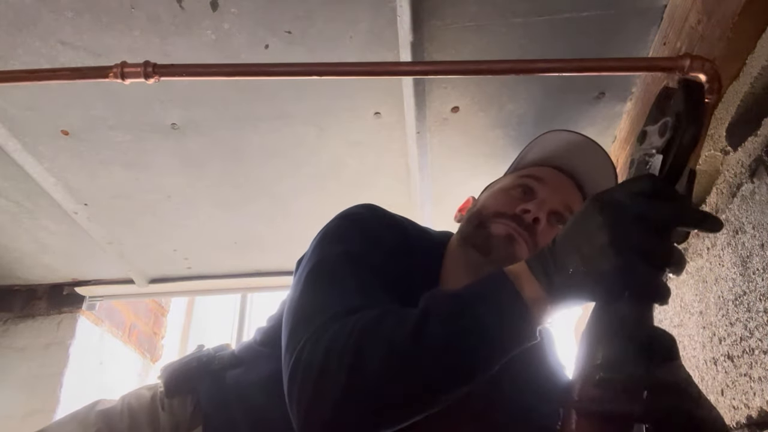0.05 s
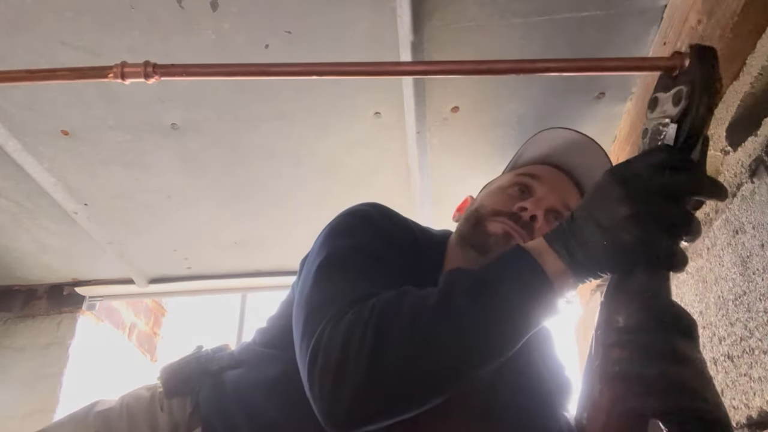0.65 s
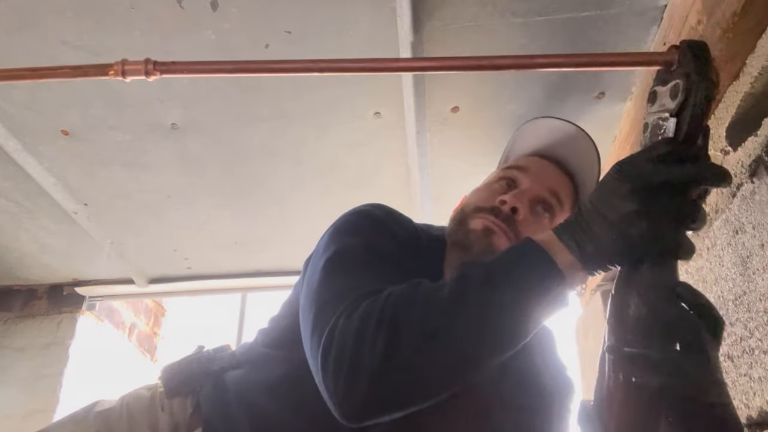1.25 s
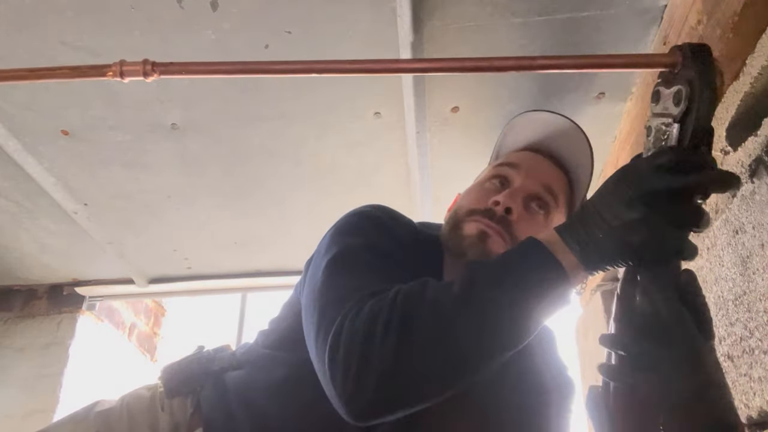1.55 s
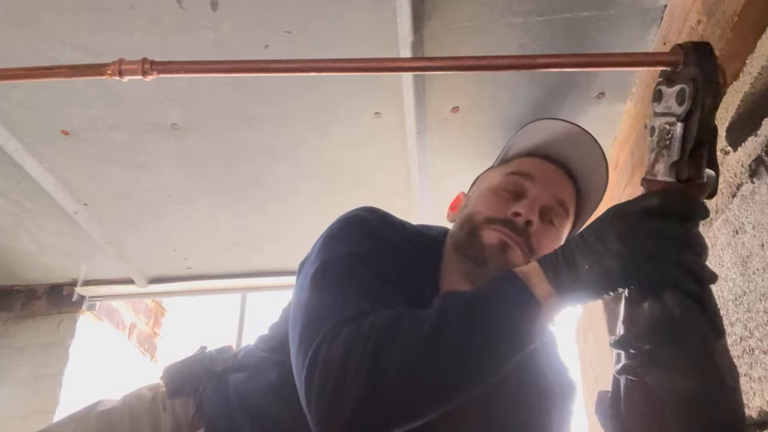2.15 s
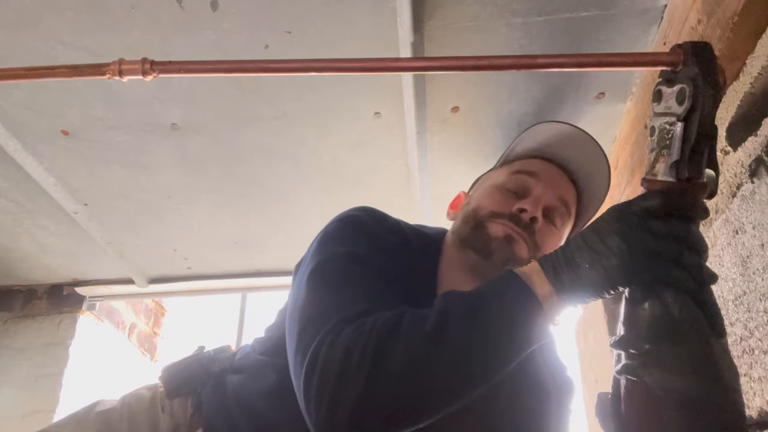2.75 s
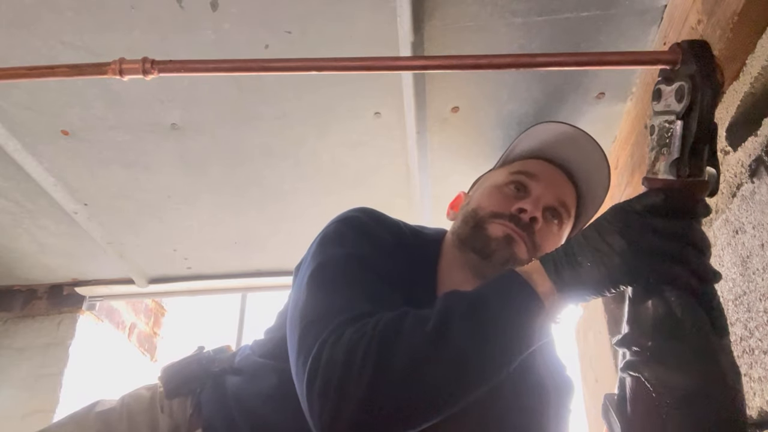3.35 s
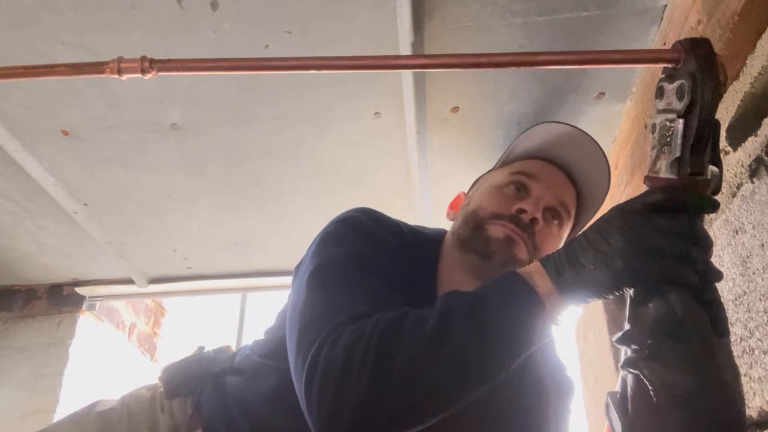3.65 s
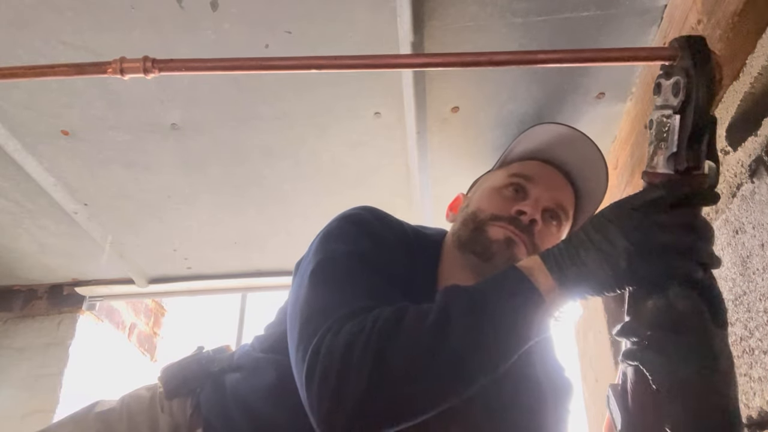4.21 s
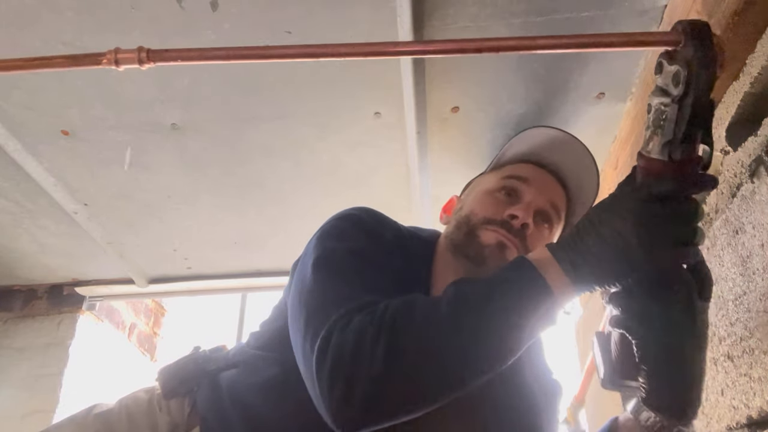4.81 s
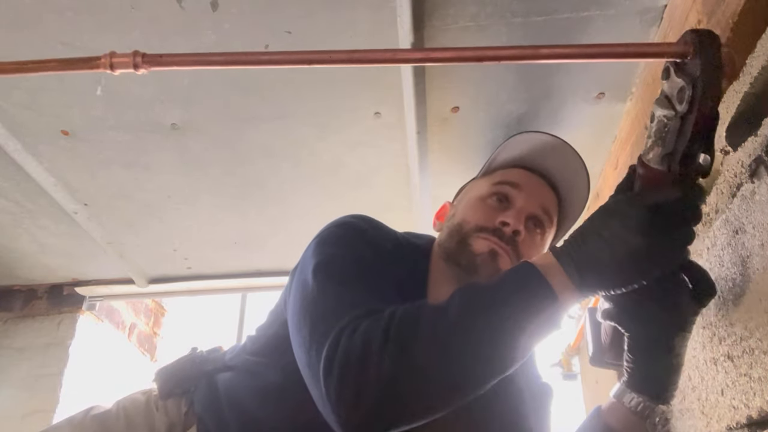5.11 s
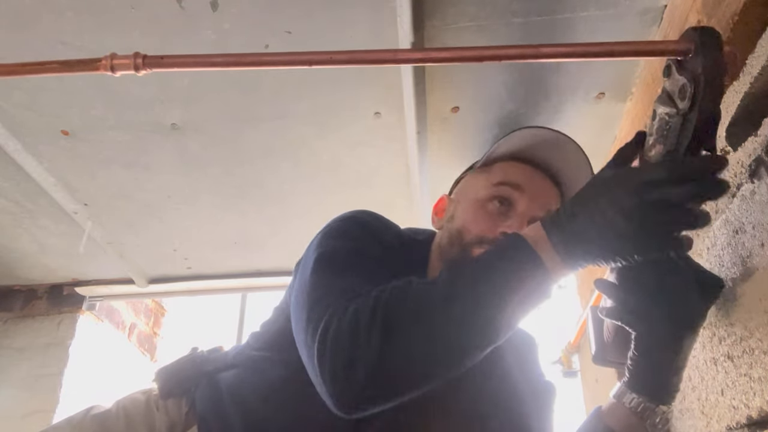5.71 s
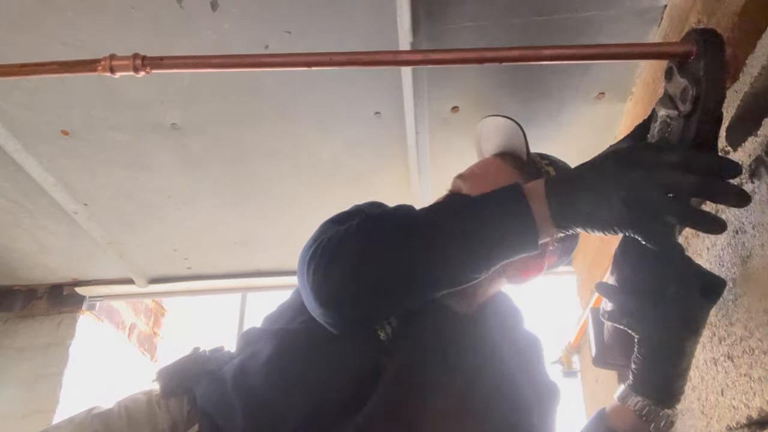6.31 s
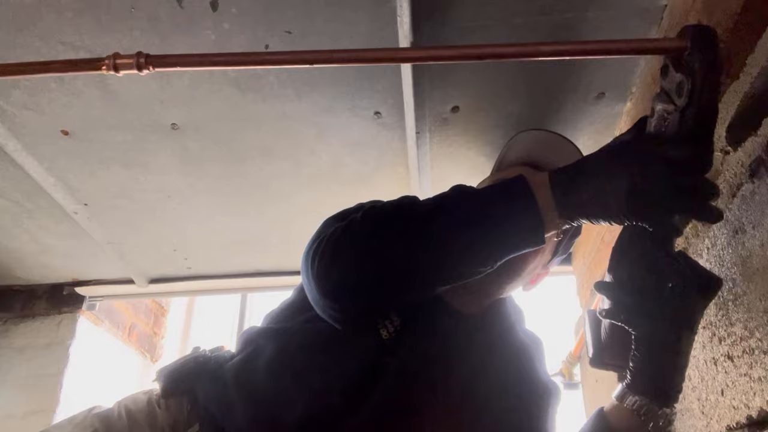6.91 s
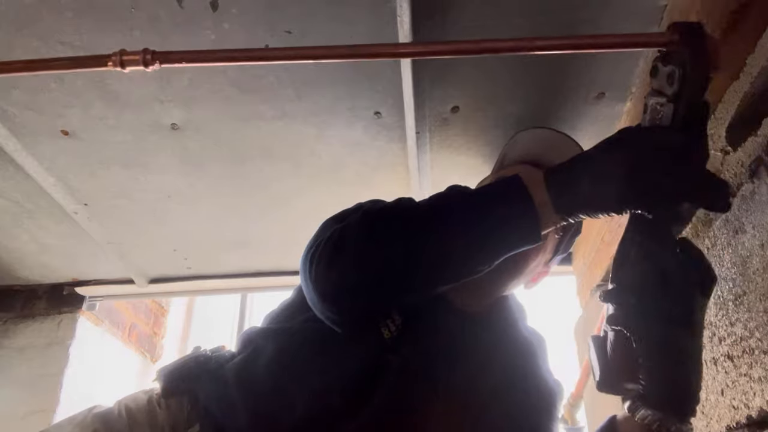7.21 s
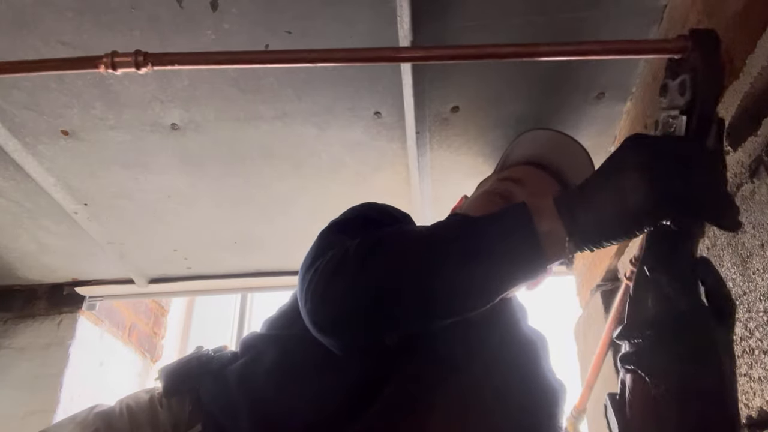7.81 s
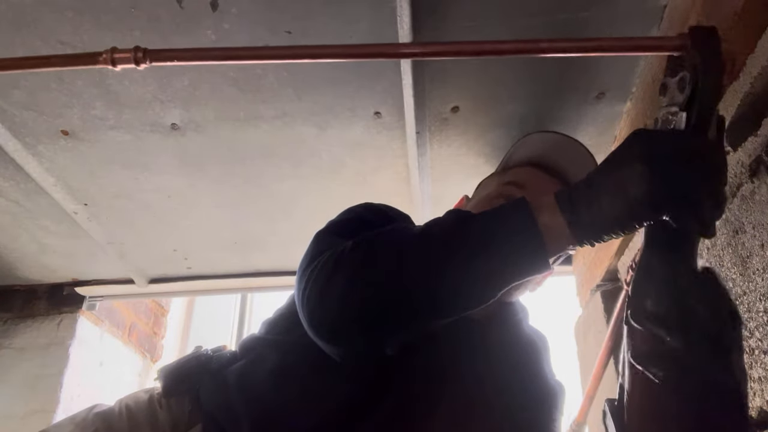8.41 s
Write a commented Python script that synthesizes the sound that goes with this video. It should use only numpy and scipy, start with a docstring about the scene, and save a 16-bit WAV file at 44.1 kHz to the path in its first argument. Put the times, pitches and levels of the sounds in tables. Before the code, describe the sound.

Metal jaws knock on a pipe fitting, then a power tool's geared motor strains, releases with a hiss and coasts to rest.

```python
"""Over a basement's low rumble, a battery press tool is seated on a copper fitting: jaws knock and
ring, gloves rub, the housing clicks. The motor spins up and drives a piston pump through whining gears,
with a low groan as the pump primes. As the jaws bite, the speed sags and lurches with each stroke.
The relief valve opens with a hiss, the motor races free, is cut and coasts to rest.
Last come more clicks, rubs and knocks as the tool is handled."""
import sys
import numpy as np
from scipy import signal
from scipy.fft import rfft, irfft, next_fast_len
from scipy.io import wavfile
from scipy.ndimage import uniform_filter1d

SR = 44100
rng = np.random.default_rng(int(sys.argv[2]) if len(sys.argv) > 2 else 0)


def persist_wave(psi):
    """Save psi, clipped to +-1, as 16-bit WAV."""
    counts = np.round(np.clip(psi, -1, 1) * 32767).astype(np.int16)
    wavfile.write(sys.argv[1], SR, np.atleast_2d(counts).T)


N = 377496
T = np.arange(N) / SR
# The motor starts, the jaws meet the fitting, the relief valve opens, the motor is cut.
START_S, CONTACT_S, RELEASE_S, CUT_S = 2.174, 2.7, 5.895, 6.305
TEETH, TURNS_PER_STROKE = 9, 5.895
STROKE_SCATTER = 0.18  # relative spread in the strength of the piston's knocks


def amp(db):
    """Amplitude grows tenfold for every 20 dB."""
    return 10 ** (np.asarray(db) / 20)


def unit(x):
    """Normalisation to an rms of 1."""
    return x / np.sqrt(np.mean(x ** 2) + 1e-20)


def since(s):
    """Elapsed time in seconds from the moment s; 0 before it."""
    return np.maximum(T - s, 0)


def read(points, hz):
    """Interpolation of a spectrum on a logarithmic frequency axis."""
    f, value = np.transpose(points)
    return np.interp(np.log(hz + 1), np.log(f + 1), value)


def curves(rows):
    """Linear interpolation of each column of a time table, sample by sample."""
    s, *columns = np.transpose(rows)
    return [np.interp(T, s, column) for column in columns]


def colour(x, points):
    """Filtering as spectral multiplication; each point is a frequency in Hz and a gain in dB."""
    size = next_fast_len(x.shape[-1] + 2048)
    gain = amp(read(points, np.fft.rfftfreq(size, 1 / SR)))
    return irfft(rfft(x, size) * gain, size)[..., :x.shape[-1]]


def wander(hz):
    """Random modulation of rms 1, with hz new values a second."""
    points = rng.standard_normal(N // 16)
    return unit(np.interp(T * hz, np.arange(len(points)), points))


def add(mix, s, sound):
    """Superposition of a sound on the mix, starting at s seconds."""
    part = mix[max(round(s * SR), 0):][:len(sound)]
    part += sound[:len(part)]


# Spectrum of the room noise before its bass is shaped. Each row: frequency in Hz, gain in dB.
RUMBLE_SPECTRUM = [(12, -39), (20, -2.5), (78, 1), (135, -12.5), (223, -21), (294, -23), (525, -31.5),
                   (733, -38), (889, -39.5), (2220, -53), (2850, -56.5), (3090, -55.5), (6910, -66),
                   (10500, -58), (15000, -80.5)]
# Course of the rumble. Each row: time in seconds, level in dB.
RUMBLE_LEVEL = [(0, -43), (3.5, -42), (5.3, -47.5), (6.5, -44.5), (7.6, -43), (8.3, -41.5)]
# A steady high tone. Each row: frequency in Hz, rms level in dB.
STEADY_TONE = [(10352, -95)]


def rumble(side_db=-17):
    """Coherence at long wavelengths: the building rumbles alike in both ears, with faint hiss and tone."""
    bass_shape = [(22, -26.0), (32, -6.5), (44, 3.5), (62, 1.0), (80, -6.0), (140, 3.0)]
    mid, side = colour(colour(rng.standard_normal((2, N)), RUMBLE_SPECTRUM), bass_shape)
    side = colour(side, [(60, side_db), (150, -8.5), (500, 0.5), (2000, 0.0)])
    (level_db,) = curves(RUMBLE_LEVEL)
    air = np.array([mid + side, mid - side]) / np.std(mid) * amp(level_db)
    return air + sum(amp(db) * np.sqrt(2) * np.sin(2 * np.pi * hz * T) for hz, db in STEADY_TONE)


# Reverberation of the basement. Each row: frequency in Hz, time to fall 60 dB in seconds.
ROOM_T60 = [(150, 0.02), (600, 0.3153), (2000, 0.12), (6000, 0.19), (14000, 0.13)]
# How alike left and right sound in each band: wide below 5.5 kHz, narrowing to one point near 12 kHz.
# Each row: frequency in Hz, likeness from 0 to 1.
STEREO_LIKENESS = [(250, 0.034), (600, 0), (5500, 0), (7000, 0.31), (9000, 0.76), (12000, 1),
                   (14000, 0.014)]


def echo(x):
    """Reverberation: dense reflections from walls and ceiling die away exponentially in each band."""
    t = np.arange(SR // 2) / SR
    reflections = rng.standard_normal((2, len(t))) * (rng.random((2, len(t))) < .07) * (t > .002)
    hz, s, (left, right) = signal.stft(reflections, SR, nperseg=256)
    likeness = np.clip(read(STEREO_LIKENESS, hz), 0, 1)[:, None]
    right = likeness * left + np.sqrt(1 - likeness ** 2) * right
    decay = amp(-60 * s / read(ROOM_T60, hz)[:, None])
    _, tail = signal.istft(np.array([left, right]) * decay, SR, nperseg=256)
    tail /= np.linalg.norm(tail, axis=1, keepdims=True)
    return signal.oaconvolve(x[None], tail, axes=1)[:, :N]


# The tool's balance. Each row: frequency in Hz, left minus right level in dB before scaling by aside.
LEVEL_DIFFERENCE = [(60, -9.5), (110, -7), (200, -9.5), (380, -2.5), (1050, -5), (1350, 1.5), (2300, 1.5),
                    (3200, 6), (4100, -4.5), (5400, -18), (6600, -7), (8500, -2), (10500, -0.5)]
# Phase between the microphones. Each row: frequency in Hz, lead of the left in radians at facing 1.
PHASE_DIFFERENCE = [(480, 0), (800, -2.5), (1130, -1.2), (1450, -3.1), (2200, -3.7), (3200, -4.3),
                    (3800, -5.7), (5300, -8.3), (6000, -9.9), (7000, -9.4), (8200, -9.1), (9200, -8.4),
                    (11200, -6.3), (12200, -6.2), (14000, -3.9)]
# Response of both microphones. Each row: frequency in Hz, gain in dB.
MIC_RESPONSE = [(400, -0.5), (650, 0), (1000, 0.2), (1300, 0), (1650, 2.27), (2100, 1.37), (3200, 0.97),
                (4000, 0), (5400, -1), (6300, 0.87), (7700, 4.08), (8600, 2.5), (9500, 0.23), (11200, -2.5),
                (14000, -1)]


def basement(x, wet_db, facing=1, aside=0.61, tails=1, sway_hz=5, shadow_hz=7000):
    """Direct and reverberant sound add; differences of phase and level place the source.
    Facing 1 (right) delays the left channel; -1 (left) advances it."""
    shares = np.exp([wander(sway_hz) for _ in range(tails)])  # hand sway shifts the echo among tails
    wet = sum(echo(x * share) for share in shares / np.linalg.norm(shares, axis=0))
    left, right = (x + amp(wet_db) * wet) / np.hypot(1, amp(wet_db))
    size = next_fast_len(N + 2048)
    hz = np.fft.rfftfreq(size, 1 / SR)
    # Above shadow_hz the microphone's casing alone sets how the phase runs on.
    phase = read(PHASE_DIFFERENCE, hz) + (facing - 1) * read(PHASE_DIFFERENCE, np.minimum(hz, shadow_hz))
    lean = amp(aside * read(LEVEL_DIFFERENCE, hz) / 2)
    spectra = np.array([rfft(left, size) * lean * np.exp(1j * phase), rfft(right, size) / lean])
    return irfft(spectra * amp(read(MIC_RESPONSE, hz)), size)[:, :N]


# Gloves and sleeves on the tool. Each row: start in seconds, length in seconds, relative level in dB.
GLOVE_SLIDES = [(0.943, 0.11, -59.5), (1.423, 0.064, -56), (1.647, 0.24, -53.5), (1.863, 0.038, -58),
                (1.94, 0.24, -69.5), (6.91, 0.037, -41), (6.925, 0.34, -55.5), (6.967, 0.032, -39),
                (7.284, 0.18, -56), (7.514, 0.21, -52), (7.826, 0.2, -55.5), (8.15, 0.15, -48.5),
                (8.255, 0.2, -53.5), (8.432, 0.15, -61.5)]
# Spectrum of rubbing fabric. Each row: frequency in Hz, relative level in dB.
FABRIC_SPECTRUM = [(500, 0.5), (1500, -3), (3200, -7), (4500, -10), (8000, -4), (10200, -4.5), (13000, -12),
                   (15000, -11)]


def gloves(gain_db=1, grain=0.7):
    """Stick-slip friction: fabric catches in fine grains, and each slide swells and fades in one arch."""
    envelope = np.zeros(N)
    for s, length, db in GLOVE_SLIDES:
        add(envelope, s, amp(db) * np.sin(np.pi * np.arange(0, length, 1 / SR) / length))
    friction = rng.standard_normal(N) * np.exp(grain * np.tanh(wander(600)))
    return amp(gain_db) * envelope * unit(colour(friction, FABRIC_SPECTRUM))


def blow(low_db, middle_db, high_db, t60, attack_s=0.00021):
    """Modal overlap: an impact's dense, damped modes merge into decaying noise, shaped in three bands."""
    t = np.arange(8192) / SR
    spectrum = [(120, low_db - 10.5), (380, low_db - 3.5), (700, low_db),
                (1550, (low_db + middle_db) / 2 - 0.5),
                (2300, middle_db), (3100, middle_db - 7.5), (3900, middle_db - 10.5),
                (5200, (middle_db + high_db) / 2 + 0.5), (7500, high_db - 3.5), (13000, high_db - 7.0)]
    noise = colour(rng.standard_normal(len(t)), spectrum)
    return noise * amp(-60 * t / t60) * np.minimum(t / attack_s, 1)


# Clicks of housing and trigger. Each row: start in seconds, relative levels of the low, middle and
# high bands in dB, time to fall 60 dB in seconds.
HOUSING_CLICKS = [(1.4364, -60, -60, -63, 0.027), (2.165, -34.5, -54, -69, 0.065),
                  (5.686, -48, -42, -27, 0.02), (7.061, -35, -37, -30, 0.031),
                  (7.108, -36.5, -44, -64, 0.033), (7.138, -59, -67, -52, 0.028),
                  (7.175, -43, -53, -57, 0.041), (7.21, -67, -55.5, -64, 0.025),
                  (7.276, -41, -66, -72, 0.061), (7.469, -58, -58, -63, 0.02),
                  (7.64, -42, -45, -49.5, 0.033), (8.189, -48, -69, -41, 0.16),
                  (8.478, -59, -63, -65, 0.033)]


def clicks(click_db=20, snap_db=3):
    """Heavy damping: the plastic housing gives a snap of contact and a short click with no pitch."""
    out = np.zeros(N)
    for s, low_db, middle_db, high_db, t60 in HOUSING_CLICKS:
        add(out, s, amp(click_db) * blow(low_db, middle_db, high_db, t60))
        add(out, s, amp(high_db + snap_db) * rng.standard_normal(100) * np.hanning(100))
    return out


# Jaws striking the fitting. Each row: start in seconds, relative levels of the low, middle and high
# bands and of the ring in dB, ring's tilt in dB per octave, blow's time to fall 60 dB in seconds.
JAW_KNOCKS = [(0.268, -35, -29, -40, -28.5, 0, 0.063), (0.28, -25.5, -28.5, -66, -42, -7, 0.086),
              (0.348, -37, -46, -67, -33.5, 1, 0.22), (0.41, -40, -62, -70, -40, -5, 0.12),
              (0.532, -36, -57, -74, -43, -5.5, 0.098), (0.578, -32, -48.5, -68, -37, -5, 0.17),
              (0.733, -32.5, -39.5, -64, -32, 2, 0.12), (0.768, -26, -44, -55, -42, -3, 0.058),
              (1.197, -31, -52.5, -66, -46, -14, 0.084), (1.454, -33.5, -54, -72, -44, -5, 0.1),
              (1.474, -31.5, -38.5, -53, -46.5, -1, 0.082), (7.389, -26.5, -25, -44.5, -29.5, 0.5, 0.059),
              (7.857, -37, -48, -47, -50, -3, 0.057), (7.883, -35.5, -54, -48, -54, -1, 0.14),
              (7.942, -41, -53, -61, -60, 2, 0.097), (8.141, -25, -44.5, -50, -46, -4, 0.054),
              (8.159, -27, -60, -40, -49, 0, 0.06)]
# Modes of jaws and pipe. Each row: frequency in Hz, relative level in dB, time to fall 60 dB in seconds.
METAL_MODES = [(556.2, 6, 0.31), (588, 0, 0.3), (724, 7, 0.14), (839, 7, 0.12), (1053, -5, 0.11),
               (1142, 3.5, 0.11), (1305, 7.5, 0.1), (1835, 13, 0.11), (1886, 16.5, 0.082), (2144, 9, 0.12),
               (2320, -3, 0.078), (2575, 6, 0.12), (2930, -6, 0.14), (3130, 0, 0.12), (3214, -2, 0.17),
               (3400, -9, 0.09), (4230, -25, 0.091), (5240, -20, 0.053)]


def jaws(blow_db=13.0, ring_db=-0.5, scatter_db=3, pivot_hz=1800):
    """Free vibration: jaws and copper pipe ring after a knock; where it lands decides each mode's share."""
    out, t = np.zeros(N), np.arange(SR // 2) / SR
    for s, low_db, middle_db, high_db, metal_db, tilt_db, t60 in JAW_KNOCKS:
        ring = np.zeros(len(t))
        for hz, db, mode_t60 in METAL_MODES:
            mode_db = db + tilt_db * np.log2(hz / pivot_hz) + scatter_db * (2 * rng.random() - 1)
            ring += amp(mode_db - 60 * t / mode_t60) * np.sin(2 * np.pi * (hz * t + rng.random()))
        add(out, s, amp(metal_db + ring_db) * ring / np.std(ring[:800]) * np.minimum(t / 0.0071, 1))
        add(out, s, amp(blow_db) * blow(low_db, middle_db, high_db, t60, attack_s=0.00164))
    return out


def valve(hiss_db=-22.0, t60=0.47, attack_s=0.0062):
    """Jet noise: oil spurts through the relief valve, and the hiss fades as the pressure drops."""
    t = since(RELEASE_S - 0.015)
    spray = unit(colour(rng.standard_normal(N), [(500, -25), (3500, -14), (7500, 12), (13000, 11.5)]))
    return amp(hiss_db - 60 * t / t60) * np.minimum(t / attack_s, 1) * spray


# The pump priming. Each row: time in seconds, frequency in Hz, rms level in dB.
PRIMING_GLIDE = [(2.23, 209, -65.5), (2.27, 167, -39), (2.33, 146, -46.5), (2.40, 145, -35.5),
                 (2.45, 128, -31.5), (2.49, 120, -76)]


def groan(fade_s=0.0091):
    """A glide, its phase the integral of frequency: a short tone falls as the oil starts to move."""
    hz, db = curves(PRIMING_GLIDE)
    start, end = PRIMING_GLIDE[0][0], PRIMING_GLIDE[-1][0]
    gate = np.clip(np.minimum(T - start, end - T) / fade_s, 0, 1)
    return amp(db) * np.sqrt(2) * np.sin(2 * np.pi * np.cumsum(hz) / SR) * gate


# The speed the motor can hold as the jaws squeeze. Each row: time in seconds, speed in turns a second.
HELD_SPEED = [(2.35, 350), (2.55, 352.5), (3.24, 354.3), (3.38, 349.6), (3.53, 339.5), (3.96, 333.6),
              (4.32, 307.3), (4.82, 289.4), (5.3, 278.4), (5.68, 266), (5.85, 251)]


def motor(spin_up_s=0.036, recover_s=0.078, coast_s=0.455, dump_s=0.065):
    """Inertia and load: the motor spins up, sags, recovers on release, then coasts against friction."""
    free_speed, loaded_speed, open_speed, dry_friction = 356, 252, 348, 76  # turns a second
    (held,) = curves(HELD_SPEED)
    speed = held * (1 - np.exp(-since(START_S) / spin_up_s))
    speed = open_speed + (speed - open_speed) * np.exp(-since(RELEASE_S) / recover_s)
    speed = np.maximum((speed + dry_friction) * np.exp(-since(CUT_S) / coast_s) - dry_friction, 0)
    opened = 1 - np.exp(-since(RELEASE_S) / dump_s)
    load = (free_speed - held) / (free_speed - loaded_speed) * (1 - opened)
    slowed_db = 20 * np.log10(np.where(T > CUT_S, speed / open_speed, 1) + 1e-4)
    return speed, load, opened, slowed_db


def shaft(speed, load, flutter=0.00145, lurch_depth=0.078, stumble=0.05):
    """Periodic loading slows the motor in each stroke; gives running counts of turns and strokes."""
    strokes = np.cumsum(speed) / SR / TURNS_PER_STROKE
    lurch = lurch_depth * np.clip(load, 0, 1) ** 1.4
    ripple = lurch * (stumble * wander(120) - np.sin(2 * np.pi * strokes)) + flutter * wander(200)
    return np.cumsum(speed * (1 + ripple)) / SR, strokes


def beats(strokes, scatter):
    """An impulse train: one pulse of random strength for each stroke."""
    return np.diff(np.floor(strokes), prepend=0) * (1 + scatter * rng.standard_normal(N))


def thud(load, strokes, level_db=-48):
    """Reaction force: under pressure each stroke shoves the whole tool."""
    response = [(70, -14), (140, 5.0), (200, -35.5), (340, 12.0), (500, -22.0), (1500, -59.5)]
    shove = colour(beats(strokes, 2 * STROKE_SCATTER), response)
    return amp(level_db) * unit(shove) * np.clip(2 * load, 0, 1) ** 2


def hum(speed, turns, strokes, level_db, third_db=-7, body_hz=430, half_width_hz=130, body_db=-40,
        inrush_db=-26, inrush_s=0.049):
    """Rotating unbalance: the shaft hums, and its third order sweeps through the body's resonance."""
    throb = 1 + 0.45 * np.cos(2 * np.pi * strokes) + 0.12 * wander(53)
    first = amp(level_db) * np.clip(speed / 300, 0, 1) ** 6
    detuning = (3 * speed - body_hz) / half_width_hz
    resonance = amp(body_db) / np.hypot(1, detuning) * np.clip(speed / 115, 0, 1) ** 4
    torque = 1 + np.clip(np.gradient(speed) * SR / 1000, 0, 2)  # greatest while speeding up
    # The starting current makes the motor growl.
    inrush = amp(inrush_db) * np.clip(speed / 120, 0, 1) ** 2 * np.exp(-since(START_S) / inrush_s)
    third = first * amp(third_db) + resonance * torque + inrush
    return throb * (first * np.cos(2 * np.pi * turns) + third * np.cos(2 * np.pi * 3 * turns))


# Spectrum of tooth and bearing impacts. Each row: frequency in Hz, relative level in dB.
IMPACT_SPECTRUM = [(100, -26), (220, -4.5), (400, -1), (900, -5.5), (1250, 1.5), (1550, -2), (2000, 5.5),
                   (2550, -2.5), (3400, 6.5), (4150, -2), (5500, 3.5), (7700, -2), (9500, 3), (14500, -6)]


def rattle(speed, load, strokes, level_db, gain_db=2, grain=0.44, dull_db=-3, fizz_db=-5):
    """Impact noise: countless small hits pulse with the crank, fizzy at full speed, duller when slow."""
    pulsing = (0.11 + 0.22 * load) * np.cos(2 * np.pi * strokes)
    impacts = rng.standard_normal(N) * np.exp(grain * wander(2500) + pulsing)
    bright = unit(colour(impacts, IMPACT_SPECTRUM))
    dull = unit(colour(impacts, [(150, -29.0), (400, -4.0), (1300, 6.0), (2500, -10.5), (6000, -52.5)]))
    fizz = unit(colour(rng.standard_normal(N), [(6000, -33.5), (10000, -16), (12800, 12), (14500, -4.5)]))
    pace = np.clip(speed / 355, 0, 1)
    blend = bright + amp(dull_db) * dull * (1 - pace) + amp(fizz_db) * fizz * pace ** 14
    return amp(level_db + gain_db) * blend


# The housing's response to the piston. Each row: frequency in Hz, relative gain in dB.
HOUSING_RESPONSE = [(100, -25), (150, -25), (220, -17), (320, -10.5), (390, 7.5), (490, -9.5), (590, 6),
                    (740, 5), (850, 7.5), (950, 1), (1060, -4), (1250, -11), (1450, -13.5), (1680, -15.5),
                    (1900, -1.5), (2200, -1.5), (3200, -8.5), (4500, -34), (9000, -34.5)]


def pump(speed, load, strokes, level_db, gain_db=-3, t60=0.087, idle_db=-5):
    """Impulse response: each knock of the piston rings the housing, harder against pressure."""
    pulses = beats(strokes, STROKE_SCATTER)
    t = np.arange(4096) / SR
    # Only the phase of a decaying noise is kept, so none of the dense modes sticks out.
    phase = np.angle(rfft(rng.standard_normal(len(t)) * amp(-60 * t / t60)))
    ring = colour(irfft(np.exp(1j * phase)), HOUSING_RESPONSE)
    knocks = signal.oaconvolve(pulses, ring)[:N]
    softer_db = idle_db * np.clip(1 - 2 * load, 0, 1)
    return amp(level_db + gain_db + softer_db) * knocks / np.std(knocks[speed > 200])


def slow_gear(speed, load, turns, strokes, level_db, gain_db=-1, load_swing_rad=5.65, order=19):
    """Phase modulation: the crank gear growls, its tooth rate swinging each stroke, wider under load."""
    response = [(450, -13.5), (590, 5.5), (720, -4.5), (880, 6), (1170, 5), (1300, -1), (1450, -10.5)]
    crank = 2 * np.pi * strokes
    wobble = 0.84 * np.sin(2 * crank) + 0.62 * wander(200)
    mesh = order * crank + (1 + load_swing_rad * load) * np.sin(crank) + wobble
    force = unit(np.exp(0.57 * np.cos(crank - 0.95) + .15 * wander(150)))
    teeth = colour(force * np.cos(mesh), response)
    # Load brings out an overtone that sags with the motor.
    overtone_phase = 2 * np.pi * 2 * (order - 1) * turns / TURNS_PER_STROKE + 2 * wobble
    overtone = amp(-12 + 14 * load) * force * np.cos(overtone_phase)
    return amp(level_db + gain_db) * (teeth + overtone) * np.clip(speed / 250, 0, 1) ** 3


# Modes of the gear casing. Each row: frequency in Hz, bandwidth in Hz, gain in dB.
CASING_RESONANCES = [(5420, 170, -1), (4800, 160, -6), (2460, 120, -8)]


def casing(x):
    """Resonance: the gear casing adds its ring whenever a tone sweeps across one of its modes."""
    return x + sum(amp(db) * signal.lfilter(*signal.iirpeak(hz, hz / width, SR), x)
                   for hz, width, db in CASING_RESONANCES)


# How well the gearbox radiates a tooth tone. Each row: frequency in Hz, gain in dB.
GEARBOX_RESPONSE = [(450, -17), (1200, -14.5), (1600, -23.5), (2150, -19.5), (2500, -25), (2800, -22.5),
                    (2980, -25.5), (3170, -23), (3300, -22.5), (3900, -28), (4100, -32), (4450, -33.5),
                    (4750, -31), (5050, -25.5), (5250, -26), (5500, -27.5), (5750, -29), (6050, -29.5),
                    (6400, -26), (7400, -32.5), (8250, -32), (9050, -20.5), (9550, -36.5), (11000, -37),
                    (12700, -32)]


def fast_gear(load, turns, strokes, level_db, tone_db, octave_db, eccentric_rad=0.61, slack_rad=0.15,
              jitter_rad=0.42, scuff_db=-30):
    """Modulation sidebands: the crank presses the meshing teeth together once a stroke.
    Load makes them chatter, so the whistle at the tooth rate turns to a rasp."""
    crank = 2 * np.pi * strokes
    squeeze = ((.35 + np.minimum(load, .7)) * np.cos(crank) - .22 * load * np.cos(2 * crank)
               + .2 * (1 - load) * np.cos(3 * crank))
    force = np.exp(squeeze + .13 * wander(300))
    force /= np.sqrt(uniform_filter1d(force ** 2, size=8192))  # holds the running rms at 1
    runout = np.sin(crank) + .5 * np.sin(2 * crank) + 0.45 * np.sin(3 * crank)
    mesh = 2 * np.pi * TEETH * turns + eccentric_rad * (1 - load) * runout + slack_rad * wander(500)
    strain = np.sqrt(np.clip(load, 0, 1))
    jitter = jitter_rad * strain * wander(400)
    chatter = unit(np.exp(.7 * strain * np.cos(4 * crank + .4 * wander(90))))
    before_contact = (1 - np.tanh((T - CONTACT_S) / 0.07)) / 2
    harmonics = [amp(3 * before_contact + tone_db) * chatter, amp(2.47 + octave_db), amp(-1),
                 amp(-6 - 25 * load)]  # only a lightly loaded gear sings the fourth
    mellow_db = -0.5 * np.minimum(since(CUT_S) / 0.043, 1)  # undriven teeth meet softly
    whine = sum(gain * amp(k * mellow_db) * np.cos(k * mesh + jitter / k)
                for k, gain in enumerate(harmonics, 1))
    scrape = force ** 2 * rng.standard_normal(N)  # hard-pressed teeth scuff and ring the casing
    scuff = amp(scuff_db) * load * unit(casing(scrape) - scrape)
    radiated = casing(colour(force * whine, GEARBOX_RESPONSE)) + scuff
    return amp(level_db) * radiated * np.minimum(since(START_S) / 0.15, 1)


# Each part's level over the cycle. Each law: relative level running light in dB, dB added at full
# pressure, dB added with the valve open, dB of level per dB of speed while coasting.
WHINE_LEVELS = (-0.5, -2.5, -5, 1.2)
HUM_LEVELS = (-31.5, -10, -5.5, 1)
PUMP_LEVELS = (-31, -1, -2.5, 4)
GROWL_LEVELS = (-33.5, -8, -6.5, 3)
RATTLE_LEVELS = (-27, -4, -3, 1.33)
# Slow swells. Each row: time in seconds, then gains in dB of the tooth tone, of its octave, and of
# the pump and slow gear together.
LEVEL_SWELLS = [(2.3, 1, -2.5, 0.5), (2.8, 1, -6.5, 1.5), (3.25, 1, -0.5, -1), (3.7, 0.5, -0.5, -2.5),
                (4.1, 1.5, 3, 0), (4.42, -3, 3, 3.5), (4.62, -0.5, -1.5, 3), (5.0, -3.5, 0, 1),
                (5.32, -1.5, -2, 2.5), (5.6, -1, 0, 2.5), (5.9, -1, 2, -3.5), (6.1, -2, -0.5, 1)]


def scene(kick_db=6, kick_s=0.013, early_s=0.0088):
    """Superposition: the parts driven by one motor and the handling noises add in a reverberant room."""
    speed, load, opened, slowed_db = motor()
    turns, strokes = shaft(speed, load)
    laws = WHINE_LEVELS, HUM_LEVELS, PUMP_LEVELS, GROWL_LEVELS, RATTLE_LEVELS
    whine_db, hum_db, pump_db, growl_db, rattle_db = (
        light + pressed * load + released * opened + coasting * slowed_db
        for light, pressed, released, coasting in laws)
    tone_db, octave_db, stroke_db = curves(LEVEL_SWELLS)
    jolt_db = kick_db * np.exp(-since(START_S + kick_s) / kick_s)  # the first strokes jolt the housing
    running = np.minimum(since(START_S - early_s) / 0.045, 1)  # gears take up slack just before turning
    low = running * (hum(speed, turns, strokes, hum_db) + thud(load, strokes)) + groan()
    whine = fast_gear(load, turns, strokes, whine_db, tone_db, octave_db)
    growl = running * slow_gear(speed, load, turns, strokes, growl_db + stroke_db)
    piston = running * pump(speed, load, strokes, pump_db + jolt_db + stroke_db)
    clatter = running * rattle(speed, load, strokes, rattle_db) + valve()
    return (basement(low, wet_db=-7.0)
            + basement(whine + growl, wet_db=-5.5)
            + basement(piston, wet_db=-1.0, aside=0.79, tails=2)
            + basement(clatter, wet_db=6.0, aside=0.56, tails=4)
            + basement(jaws(), wet_db=-7.5, facing=-1.07, aside=0.63)
            + basement(clicks() + gloves(), wet_db=-7.5, aside=0.79)
            + rumble())


def record(dry):
    """Band limiting: a linear-phase low-pass filter removes the treble above 14.4 kHz."""
    lowpass = signal.firwin(255, 14400, window=("kaiser", 9), fs=SR)
    return signal.oaconvolve(dry, lowpass[None], "same")


dry = scene()
out = record(dry)
persist_wave(out)
```